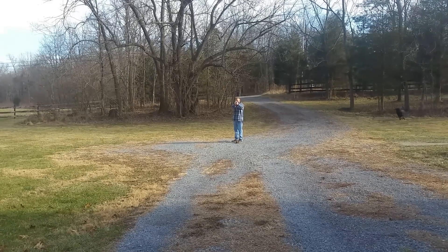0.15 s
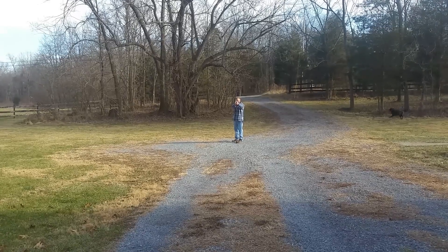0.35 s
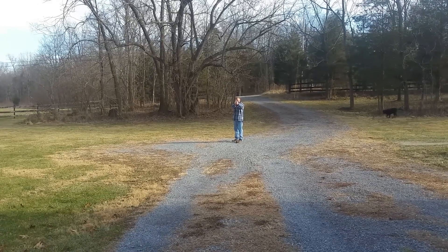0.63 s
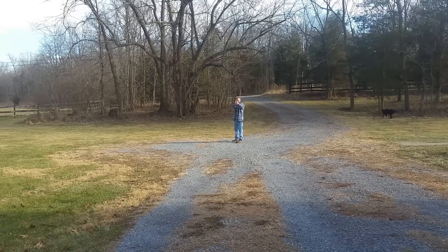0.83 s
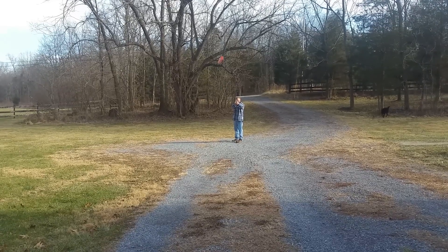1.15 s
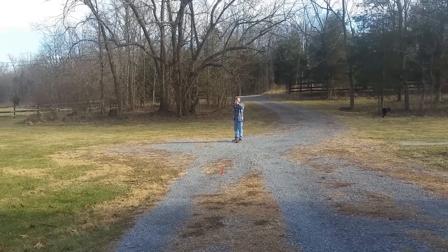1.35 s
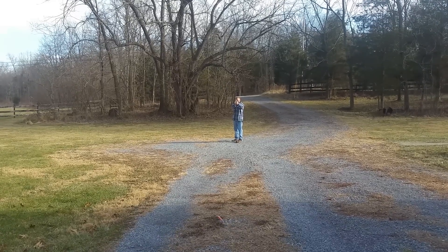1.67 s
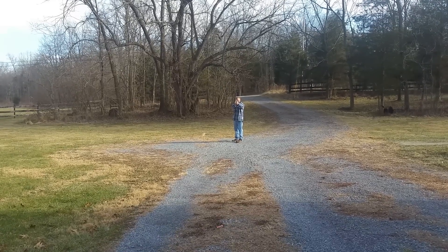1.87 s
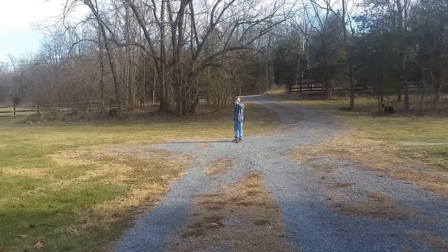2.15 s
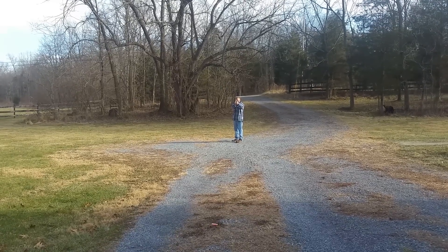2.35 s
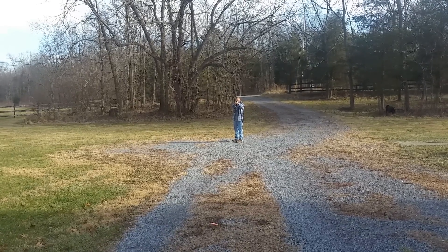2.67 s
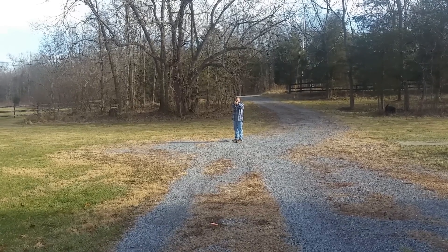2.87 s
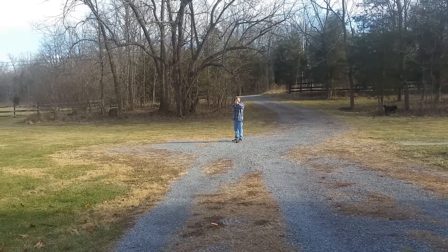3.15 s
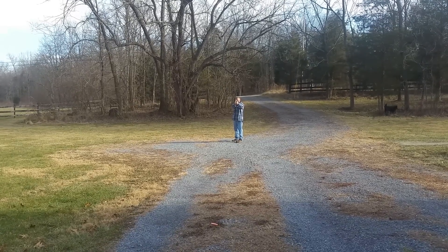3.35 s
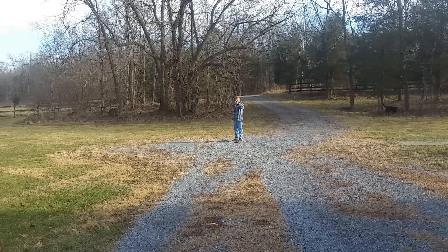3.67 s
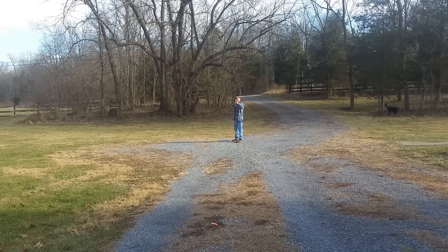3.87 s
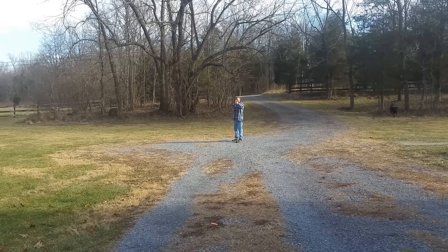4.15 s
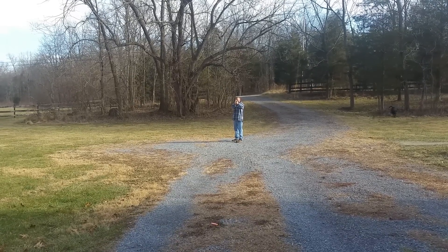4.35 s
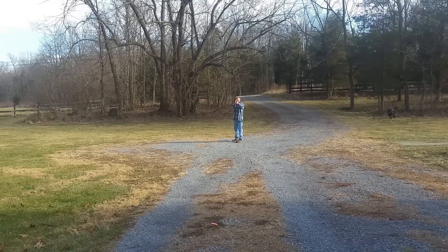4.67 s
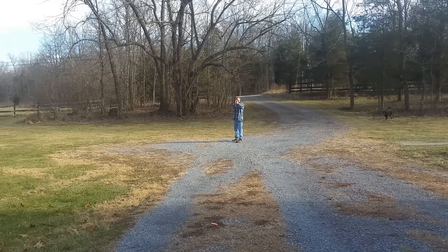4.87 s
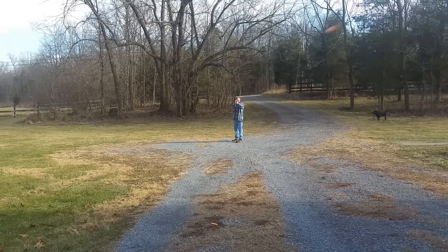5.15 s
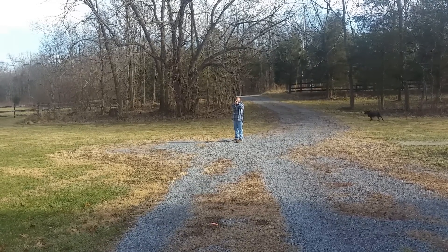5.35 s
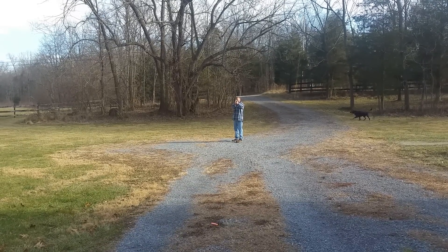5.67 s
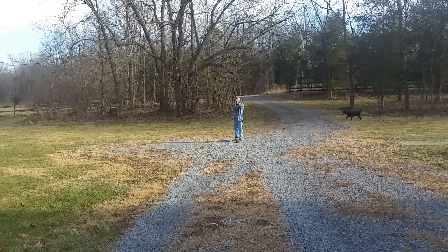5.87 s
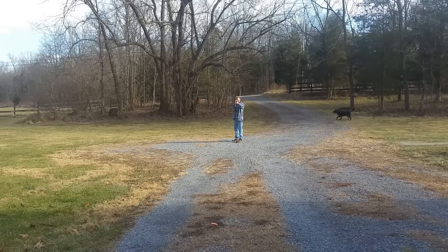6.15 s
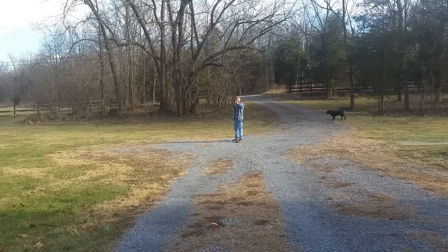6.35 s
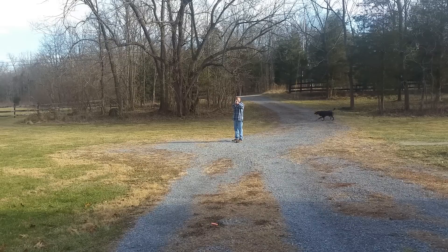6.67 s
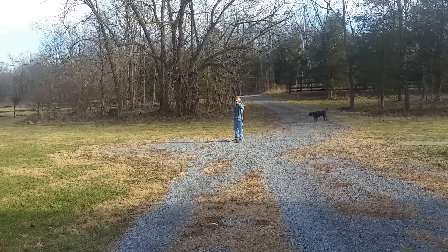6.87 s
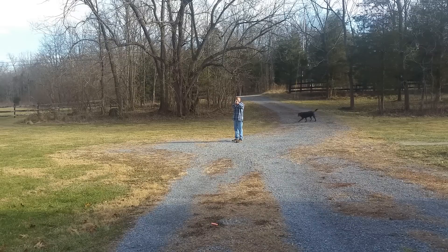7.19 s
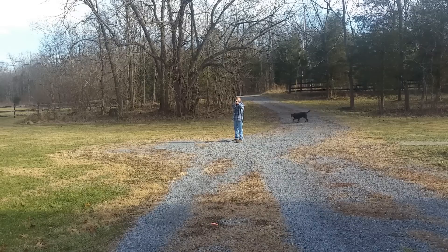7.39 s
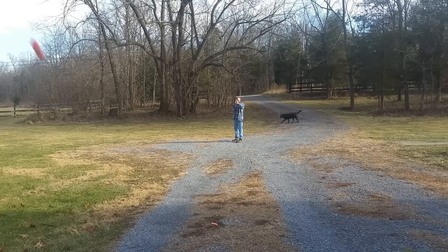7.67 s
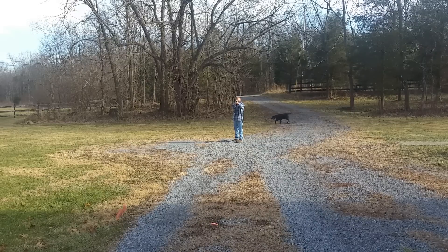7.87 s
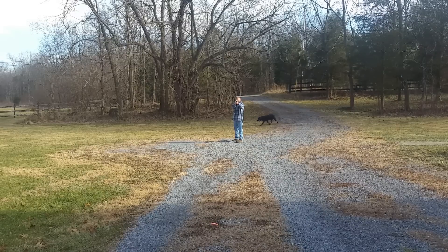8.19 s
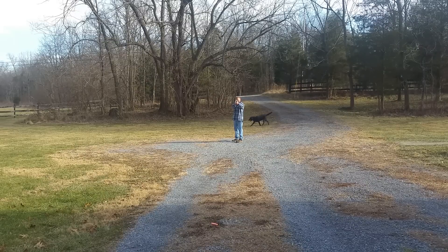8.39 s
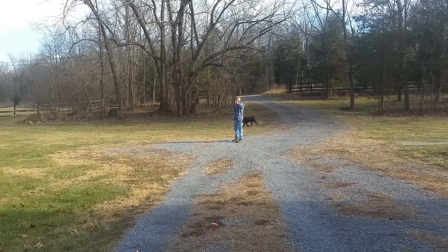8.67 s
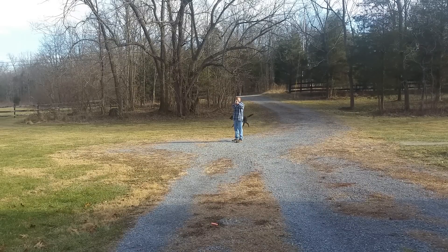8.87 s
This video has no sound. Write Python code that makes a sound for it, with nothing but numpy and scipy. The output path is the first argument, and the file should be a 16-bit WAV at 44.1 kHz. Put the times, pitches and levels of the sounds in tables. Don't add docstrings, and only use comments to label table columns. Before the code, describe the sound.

Across a yard, a motorised foam dart blaster whines and clacks steadily, each dart smacking hard beside the microphone with short garage echoes.

```python
import sys
import numpy as np
from scipy import signal
from scipy.fft import rfft, irfft, next_fast_len
from scipy.io import wavfile
from scipy.ndimage import uniform_filter1d, map_coordinates

SR = 44100
rng = np.random.default_rng(int(sys.argv[2]) if len(sys.argv) > 2 else 0)


def decibels_to_gain(level_db):
    exponent = np.asarray(level_db, float) / 20
    return 10 ** exponent


def store_wav(level_fs):
    pcm = np.round(np.clip(np.atleast_2d(level_fs), -1, 1) * 32767)
    wavfile.write(sys.argv[1], SR, pcm.T.astype(np.int16))


N = 398223

# start in seconds, clack over the whine in dB, pitch of the snap in Hz,
# level of the snap in dB.
LAUNCHES = [
    (.4576, 50.5, 4150, 4.5),
    (1.7739, 50, 3940, 1),
    (2.9748, 50, 4180, -2),
    (3.9535, 48, 3230, 0),
    (4.9603, 49.5, 3320, 6.5),
    (6.2501, 50, 3600, -2),
    (7.1949, 48.5, 3500, 4),
    (8.0960, 50, 3800, 3.5),
    (8.9631, 51.5, 3850, -2),
]
# start in seconds, crack level in dB, echo level in dB,
# left over right in dB, lag of the left side in milliseconds.
SMACKS = [
    (.7674, -6, -15.5, 1, 0),
    (2.0912, -6, -16, -1, -.05),
    (3.2987, 1, -15, -1, 0.024),
    (4.2988, -2.5, -16.5, 1, -.05),
    (5.3278, 0, -22.5, -1.5, 0.11),
    (6.6778, -1.5, -12.5, -3, .25),
    (7.5256, -12, -15, -25, 0.017),
    (8.4187, -4.5, -18.5, 0, 0.029),
]
# frequency in Hz, likeness from 0 to 1.
FAR_LIKENESS = [(60, 1), (290, .75), (700, 0.43), (3100, 0.44), (6800, 0.033), (15000, 0.57)]


def motors():
    # turns a second in Hz, then rows of multiple of that speed, level in dB.
    wheels = [
        (275.4, [(5, -74.5), (6, -69.5), (12, -78), (18, -99)]),
        (282.8, [(6, -70.5), (12, -83.5), (18, -93)]),
    ]
    # frequency in Hz, width in Hz, level in dB.
    cage = [(3170, 68, 1.5), (4895, 66, 10)]
    # multiple of its turning speed, level in dB.
    feeder_tones = [(1, -70), (13, -93), (14, -61.5), (15, -68.5), (26, -72.5)]
    # frequency in Hz, level in dB.
    gears = [(1132, -70), (1497, -81.5), (1900, -78.5), (2035, -78), (2436, -74), (2760, -81.5),
             (3467, -80), (3564, -79), (4032, -85)]
    # frequency in Hz, level in dB.
    mesh = [(1102, -70.5), (1319, -78), (1534, -80), (2164, -71), (3097, -78.5)]
    # frequency in Hz, level in dB.
    strain = [(4625, -88)]
    # frequency in Hz, level in dB per Hz.
    whirr = [(350, -69), (600, -27), (817, -9), (983, -10), (1130, -17.5), (1190, -16.5), (1660, -12),
             (1780, -14), (2170, -10), (7000, -35), (9100, -61), (15400, -120)]
    # frequency in Hz, width in Hz, level in dB.
    shell = [(1090, 41, -2.5), (1313, 31, 2.5), (1665, 70, -4), (2163, 19, -3), (2490, 20, -3),
             (2700, 35, -32), (3148, 76, -2), (3295, 68, -4.5), (3800, 32, -2), (4350, 72, -12),
             (4740, 38, -15), (5200, 55, -19)]
    feeder_hz, off_centre_hz, off_centre_depth = 59.95, 63.7, 0.7

    wheel = speed(drop=.08, recover=.2) + .0006 * wobble(5)
    feeder = speed(drop=.022, recover=.45)
    tones = sum(orders(hz * wheel, table, flutter_db=3.5, blur=.5) for hz, table in wheels)
    tones = tones * decibels_to_gain(-30 * (1 - wheel))
    tones = filtered(tones, lambda hz: 1 + np.abs(resonances(cage)(hz)))
    tones = tones + orders(feeder_hz * feeder, feeder_tones, flutter_db=1.9, blur=0.14)
    tones = tones + orders(feeder, gears, flutter_db=2, blur=1.0)
    swell = 1 + off_centre_depth * np.cos(2 * np.pi * off_centre_hz * np.cumsum(feeder) / SR)
    tones = tones + swell * orders(feeder, mesh, flutter_db=2.0, blur=0.93)
    load = (60 * (1 - feeder)) ** 1.5
    tones = tones + load * orders(feeder, strain, flutter_db=2.2, blur=.6)

    chop = [1 + 0.2 * np.sin(2 * np.pi * np.cumsum(hz * wheel) / SR) for hz, _ in wheels]
    rattle = chop * patchy(depth_db=2.5)
    broad = unit(stereo(rattle, lambda hz: decibels_to_gain(along(whirr, hz)), FAR_LIKENESS))
    shell_gain = lambda hz: np.abs(resonances(shell)(hz)) ** 1.52
    rung = unit(stereo(rattle[:, ::-1], shell_gain, FAR_LIKENESS))
    return tones * decibels_to_gain([[-.8], [.8]]) + decibels_to_gain(-60.5) * broad + decibels_to_gain(-67.5) * rung


def speed(drop, recover):
    t = np.arange(0, N + 64, 64) / SR
    lost = 0
    for start, *_ in LAUNCHES:
        grip = np.clip((t - start) / 0.017, 0, 1)
        lost = lost + drop * np.exp(-np.abs(t - start) / recover) * grip
    return 1 - np.interp(np.arange(N) / SR, t, lost)


def orders(hz, table, flutter_db, blur):
    turns = np.cumsum(hz) / SR
    total = 0
    for multiple, db in table:
        level = np.sqrt(2) * decibels_to_gain(db + flutter_db * wobble(11))
        total = total + level * np.sin(2 * np.pi * multiple * turns + blur * wobble(30))
    return total


def launches():
    # frequency in Hz, width in Hz, level in dB.
    thump_modes = [(190, 130, 4.5), (413, 157, 8)]
    # frequency in Hz, width in Hz, level in dB.
    clack_modes = [(930, 410, 3.5), (1720, 260, 8.5), (2470, 300, 5.5), (2980, 650, 4)]
    trees_s, trees_db = .137, -17
    out, t = np.zeros((2, N)), np.arange(SR // 20) / SR
    lead, second, third = 60, round(.0048 * SR), round(.0105 * SR)
    for start, db, snap_hz, snap_db in LAUNCHES:
        second_db, thump_db, fizz_db = rng.normal((0.5, -.5, -0.5), 0.9)
        blows = np.zeros(len(t))
        blows[[lead, lead + second, lead + third]] = [-1, -decibels_to_gain(second_db), -decibels_to_gain(-9)]
        scrape = blows + .1 * decibels_to_gain(-60 * t / .06) * rng.standard_normal(len(t))
        thump = decibels_to_gain(thump_db) * filtered(blows * (1 + 120 * t), resonances(thump_modes))
        clack = filtered(scrape, lambda hz: resonances(clack_modes)(hz) / (1 + 1j * hz / 4000))
        first = scrape * decibels_to_gain(-60 * t / 0.031)
        snap = filtered(first, lambda hz: resonances([(snap_hz, 1300, snap_db / 2)])(hz) ** 2)
        fizz = filtered(first, lambda hz: (hz > 5100) * decibels_to_gain(fizz_db - 20))
        dulled = filtered(clack + snap + thump, lambda hz: 1 / (1 + (hz / 4900) ** 12))
        sound = decibels_to_gain(gain_db(start) + db + 14.5) * (dulled + fizz)
        add(out, start - lead / SR, sound)
        answer = filtered(sound, lambda hz: 1j * hz / (1j * hz + 1200))
        add(out, start + trees_s, decibels_to_gain(trees_db) * answer)
    return out


def cracks():
    # start in seconds, height of the push,
    # frequency in Hz, scratch level in dB.
    jolts = [
        (7.52505, .98, 125, -16.5),
    ]
    out, t = np.zeros((2, N)), np.arange(-60, 200) / SR
    half = np.array([[.5], [-.5]])
    for start, crack_db, _, pan_db, lag_ms in SMACKS:
        u = (t - lag_ms / 1000 * half) / .00015
        blow = -np.exp(-u ** 2 / 2) + .5 * np.exp(-((u - 3.2) / 1.83) ** 2 / 2)
        sharp = np.diff(rng.standard_normal((2, len(t) + 2)), n=2)
        grit = sharp + 1.2 * rng.standard_normal((2, len(t)))
        tick = decibels_to_gain(-30) * np.exp(-(u + 1.4) ** 2 / 3) * grit
        add(out, start - 60 / SR, decibels_to_gain(crack_db + pan_db * half) * blow + tick)
    t = np.arange(SR // 20) / SR
    for start, height, hz, scratch_db in jolts:
        brief = np.exp(-((t - .0004) / .0002) ** 2) * [[1], [.4]]
        scratch = brief * np.diff(rng.standard_normal((2, len(t) + 2)), n=2)
        add(out, start - .0006, decibels_to_gain(scratch_db) * scratch)
        push = np.cos(2 * np.pi * hz * t) * np.exp(-3.2 * hz * t) * (1 - np.exp(-t / .00015))
        add(out[0], start, height * 1.25 * push)
    return filtered(out, lambda hz: 1j * hz / (45 + 1j * hz))


def smacks():
    # boom, body, bite, edge and treble, all in dB.
    spots = [
        (-1.5, 1.5, 3, -1.5, 0),
        (3, 0, 0.8, -.9, 1.5),
        (0, -.9, 4.5, 0, 3.5),
        (-4, 1.5, .4, 1.1, 2.5),
        (6.5, 1.5, -2, 5, 8),
        (5.5, .4, -4.5, 2.5, -6),
        (-0.5, -1.2, 3, 2.5, 1.5),
        (4, 1.5, 0.5, 1.1, 2),
    ]
    spot_hz = [70, 300, 2400, 4800, 12000]
    # door, tin and shelf, all in dB.
    shaken_db = [
        (-40, -30, -44),
        (-28.5, -33, -50),
        (-26, -31, -24),
        (-26.5, -34, -43),
        (-39.5, -36, -51),
        (-29, -23, -42),
        (-41, -28, -50),
        (-32.5, -26, -50),
    ]
    out = np.zeros((2, N))
    for (start, crack_db, echo_db, *_), spot, shaken in zip(SMACKS, spots, shaken_db):
        colour = sorted([(900, 0), *zip(spot_hz, spot)])
        held_s = max(0.049 - 0.1 * (crack_db - echo_db), .01)
        stretch = 1.13 + .006 * echo_db
        ride_db = .55 * (gain_db(start + np.arange(SR) / SR) - gain_db(start))
        add(out, start + .0008, decibels_to_gain(echo_db + ride_db) * garage(colour, held_s, stretch))
        ring_panels(out, start + 0.001987, shaken)
    return out


def garage(colour, held, stretch):
    # frequency in Hz, time to fall 60 dB in seconds.
    early_fade = [(60, 0.37), (160, 0.83), (420, 0.56), (1100, 0.35), (2900, 0.26), (7700, 0.17),
                  (15000, 0.088)]
    # frequency in Hz, time to fall 60 dB in seconds.
    late_fade = [(60, 0.5), (300, 0.98), (1000, 1.44), (3000, 1), (8000, 0.67)]
    # frequency in Hz, level in dB per Hz.
    echo_colour = [(24, -61), (40, -15.5), (302, -4), (498, -2.5), (639, -3), (884, 0), (1290, -2.5),
                   (1460, -4), (2010, -5.5), (2230, -6), (3320, -15), (7200, -33.5), (11000, -29.5),
                   (15600, -29.5)]
    # frequency in Hz, likeness from 0 to 1.
    echo_likeness = [(60, 1), (290, 0.89), (640, 0.27), (1400, 0.0067), (15000, 0.072)]
    # frequency in Hz, left over right in dB.
    side_lean = [(60, 1), (110, 0.5), (200, 0.5), (380, 0.5), (700, 0), (1290, -1), (2380, 3), (4400, -8),
                 (8120, 3.5), (15000, 10)]
    lumps = decibels_to_gain(1.75 * np.repeat(rng.standard_normal((2, SR // 25 + 1)), 25, axis=1)[:, :SR])
    hz, t, z = signal.stft(lumps * rng.standard_normal((2, SR)), SR, nperseg=256)
    after = .012 * np.logaddexp(0, (t - held) / 0.011)
    fade = 0
    for db, t60 in ((3.5, early_fade), (-20.5, late_fade)):
        fade = fade + decibels_to_gain(db - 60 * after / (stretch * along(t60, hz)[:, None]))
    bursts = uniform_filter1d(rng.standard_normal(z.shape[1:]), size=5, axis=0)
    bursts = uniform_filter1d(bursts, size=2, axis=1)
    fade = fade * decibels_to_gain(1.74 * unit(bursts))
    tail = signal.istft(z * fade, SR, nperseg=256)[1][:, :SR]
    echoes = stereo(tail, lambda hz: decibels_to_gain(along(echo_colour, hz) + along(colour, hz)), echo_likeness)
    echoes = filtered(echoes, lambda hz: decibels_to_gain(along(side_lean, hz) * [[.5], [-.5]]) * hz / (hz + 40))
    echoes = echoes * np.clip(np.arange(SR) / SR / 0.00062, 0, 1)
    return echoes / np.sqrt(np.mean(echoes[:, :SR // 25] ** 2))


def ring_panels(out, start, shaken):
    # frequency in Hz, level in dB, time to fall 60 dB in seconds.
    door = [(172.8, 1.2, .5), (314, -2.5, .65), (322, -28, 2.2), (437, -13, .75), (500, -9, .4)]
    tin = [(590, -1, .5), (755, -7, 0.29), (1000, -8.5, .4), (1332, -2, 0.37), (1652, -4, .25)]
    shelf = [(917, -8, 1.1), (965, -14, 1.1), (1013, -12, 1.3), (1105, 2, .55), (1940, -5, 0.43),
             (2174, -3, 0.43), (2920, -12, .4)]
    ring_s = .8
    t = np.arange(round(ring_s * SR)) / SR
    swell = (1 - np.exp(-t / 0.0027)) * np.clip((ring_s - t) / .12, 0, 1)
    for shake_db, modes in zip(shaken, (door, tin, shelf)):
        for hz, db, t60 in modes:
            level_db = shake_db + db - 60 * t / t60 + 3.4 * wobble(21.3, count=len(t))
            waver = (.4 + hz / 4000) * wobble(25, count=len(t))
            side_shift = rng.normal(0, hz / 900, (2, 1))
            phase = 2 * np.pi * hz * t + waver + side_shift
            add(out, start, decibels_to_gain(level_db) * swell * np.sin(phase))


def nearby():
    # time in seconds, level in dB.
    puffs = [
        (.743, -38),
    ]
    # start in seconds, level in dB.
    ticks = [
        (3.73, -57),
        (3.868, -52),
    ]
    out, t = np.zeros((2, N)), np.arange(SR // 20) / SR
    for start, db in puffs:
        u = t - .015
        add(out, start - .015, decibels_to_gain(db) * np.exp(-(u / 0.0045) ** 2) * np.cos(2 * np.pi * 70 * u))
    for start, db in ticks:
        noise = decibels_to_gain(db - 60 * t / .012) * rng.standard_normal((2, len(t)))
        add(out, start, filtered(noise, lambda hz: hz > 7000))
    return out


def background():
    # frequency in Hz, level in dB per Hz.
    rumble = [(15, -49), (25, -23), (49, -11.5), (113, -3.5), (200, -10.5), (315, -12.5), (660, -14.5),
              (750, -13), (980, -43), (1650, -120)]
    # frequency in Hz, level in dB per Hz.
    hiss_colour = [(3240, -41), (5500, -27), (6000, -32), (6210, -16), (6750, -19), (7080, -17), (8220, 10),
                   (8700, 6.5), (11000, 2), (12700, 9), (15600, 4)]
    # frequency in Hz, width in Hz, level in dB.
    brushes = [(6620, 64, -3), (7640, 96, -20), (9700, 54, 0.5), (10300, 92, -9), (12160, 190, -1),
               (12800, 52, -3), (13500, 74, -7), (14200, 32, -6)]
    yard = stereo(rng.standard_normal((2, N)), lambda hz: decibels_to_gain(along(rumble, hz)), FAR_LIKENESS)
    yard = decibels_to_gain(-66 + 1.7 * wobble(5.5)) * unit(yard)
    hiss_gain = lambda hz: decibels_to_gain(along(hiss_colour, hz)) * (1 + 2 * np.abs(resonances(brushes)(hz)))
    hiss = stereo(rng.standard_normal((2, N)), hiss_gain, FAR_LIKENESS)
    hiss = decibels_to_gain(-78 + .8 * wobble(12)) * unit(hiss)
    mix = hiss * decibels_to_gain([[1.2], [-1.2]]) + yard + decibels_to_gain(0.5) * motors()
    return decibels_to_gain(gain_db(np.arange(N) / SR) + 80.5) * mix


def gain_db(s):
    # time in seconds, gain in dB.
    gain_steps = [(0, -85.5), (.45, -84), (.9, -80), (2.05, -80.5), (2.35, -81.5), (3.27, -81),
                  (3.47, -77.5), (5.3, -77.5), (6.5, -77.5), (6.9, -71), (7.52, -71), (7.8, -79.5),
                  (9.03, -81)]
    return np.interp(s, *np.transpose(gain_steps))


def patchy(depth_db):
    z = signal.stft(rng.standard_normal((2, N)), nperseg=512)[2]
    field = uniform_filter1d(rng.standard_normal(z.shape[1:]), size=3, axis=0)
    field = uniform_filter1d(field, size=8, axis=1)
    return signal.istft(z * decibels_to_gain(depth_db * unit(field)), nperseg=512)[1][:, :N]


def stereo(pair, gain, alike):
    turn = lambda hz: np.arccos(np.clip(along(alike, hz), -1, 1)) / 2
    mid, side = filtered(pair, lambda hz: gain(hz) * [np.cos(turn(hz)), np.sin(turn(hz))])
    return np.array([mid + side, mid - side])


def resonances(modes):
    def response(f):
        total = 0
        for k, (centre, width, db) in enumerate(modes):
            damping = 1j * f * width
            total = total + (-1) ** k * decibels_to_gain(db) * damping / (centre * centre - f * f + damping)
        return total
    return response


def filtered(x, response):
    m = next_fast_len(x.shape[-1] + 8192)
    return irfft(rfft(x, m) * response(np.fft.rfftfreq(m, 1 / SR)), m)[..., :x.shape[-1]]


def below(top_hz):
    return lambda hz: np.clip((top_hz - hz) / 160 + .5, 0, 1) ** 2


def along(points, hz):
    f, v = np.transpose(points)
    return np.interp(np.log(hz + 1), np.log(f + 1), v)


def wobble(rate, count=N):
    coarse = np.arange(0, count + 64, 64)
    knots = rng.standard_normal(int(count * rate / SR) + 5)
    return np.interp(np.arange(count), coarse, map_coordinates(knots, [coarse * rate / SR]))


def unit(x):
    return x / np.sqrt(np.mean(x ** 2) + 1e-20)


def add(out, s, x):
    part = out[..., round(s * SR):][..., :x.shape[-1]]
    part += x[..., :part.shape[-1]]


def scene():
    return filtered(background() + launches() + smacks() + nearby(), below(15800)) + cracks()


def roll_off(x):
    return signal.sosfilt(signal.butter(12, 16970, fs=SR, output="sos"), x)


def record(dry):
    sound = .97 * dry / (1 + np.abs(dry) ** 8) ** (1 / 8)
    return roll_off(filtered(sound, below(16900)))


dry = scene()
out = record(dry)
store_wav(out)
```